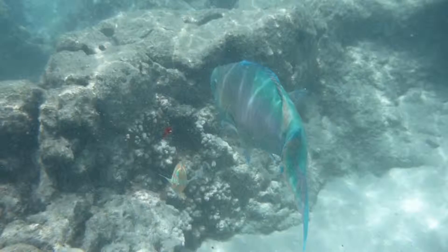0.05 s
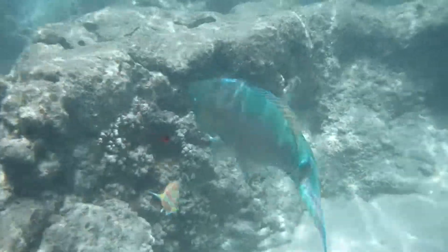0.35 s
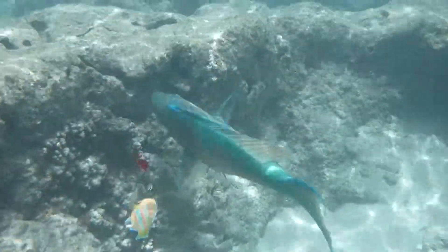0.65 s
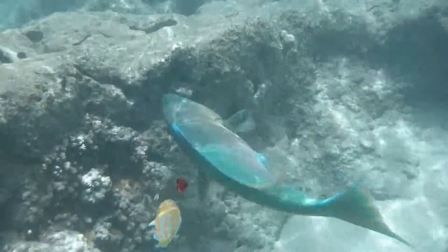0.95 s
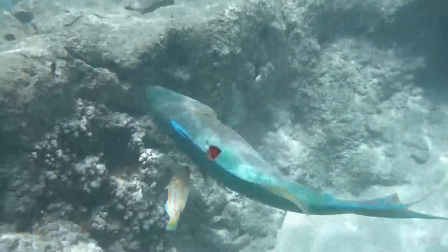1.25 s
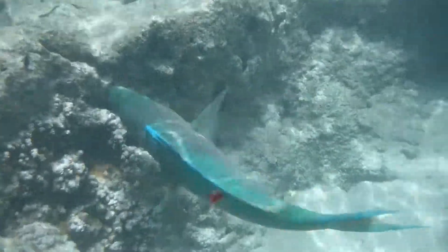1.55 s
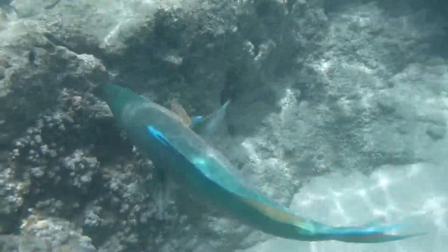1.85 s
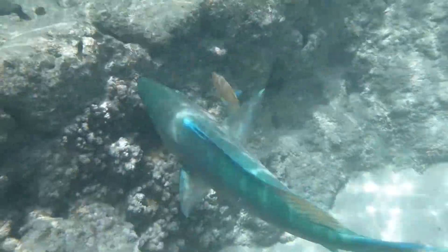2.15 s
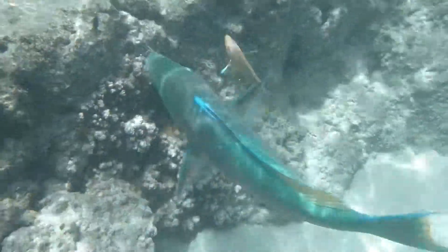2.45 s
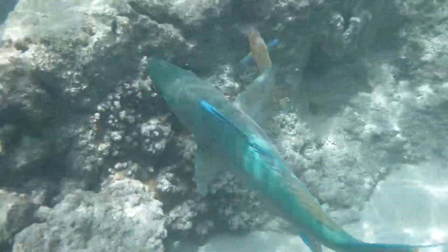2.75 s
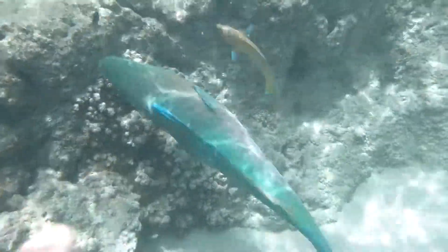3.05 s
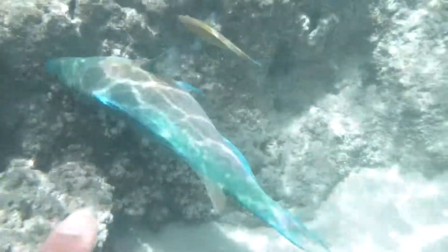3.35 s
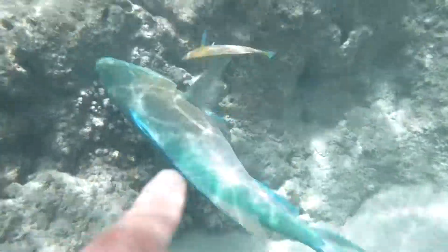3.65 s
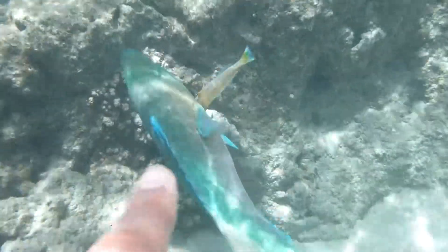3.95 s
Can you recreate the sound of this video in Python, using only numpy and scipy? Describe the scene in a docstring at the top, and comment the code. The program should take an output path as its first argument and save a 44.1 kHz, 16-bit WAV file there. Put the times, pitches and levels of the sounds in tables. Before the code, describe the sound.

Snapping shrimp crackle near and far on a reef over a low water rumble. A parrotfish rasps the coral twice. Between the bites, something rubs the underwater camera housing and thumps, while a small motor chirrs faintly.

```python
"""Shrimp and parrotfish on a reef

Under water, from a camera in its housing: snapping shrimp crackle near and far, and a parrotfish
rasps the coral twice with its beak. Water rumbles round the housing, which dulls the treble.
Something rubs along the housing and ends in a thump, and a small motor chirrs faintly inside.
There are sharp bright ticks, a faint wavering hum and a few soft low bumps."""
import sys
import numpy as np
from scipy.fft import rfft, irfft, next_fast_len
from scipy.io import wavfile
from scipy.ndimage import map_coordinates

SR = 44100
rng = np.random.default_rng(int(sys.argv[2]) if len(sys.argv) > 2 else 0)


def master_out(mix):
    """Clip the mix to full scale and print it as 16-bit PCM to the path in sys.argv[1]."""
    frames = np.transpose(np.atleast_2d(mix))
    ceiling = np.clip(frames, -1, 1)
    pcm = np.round(ceiling * 32767).astype(np.int16)
    wavfile.write(sys.argv[1], SR, pcm)


N = 176400
BURST_SIZE = 2048  # samples in one short sound; its time and frequency axes follow
BURST_T, BURST_HZ = np.arange(BURST_SIZE) / SR, np.fft.rfftfreq(BURST_SIZE, 1 / SR)


def amp(db):
    """Decibels to linear gain."""
    return 10 ** (np.asarray(db) / 20)


def unit(x):
    """Scale to rms 1."""
    return x / np.sqrt(np.mean(x ** 2) + 1e-20)


def colour_gain(colour, hz):
    """Gain at hz, from (Hz, dB) points joined on a log axis."""
    point_hz, point_db = np.transpose(colour)
    return amp(np.interp(np.log(hz + 1), np.log(point_hz + 1), point_db))


def curves(rows):
    """One value per sample for each column after the time."""
    times, *columns = np.transpose(rows)
    return [np.interp(np.arange(N) / SR, times, column) for column in columns]


def wobble(rate):
    """A smooth random curve, rate knots a second."""
    return map_coordinates(rng.standard_normal(N // 8), [np.arange(N) * rate / SR + 2])


def filtered(x, response):
    """Pass x through a complex frequency response."""
    size = next_fast_len(N + SR // 2)
    return irfft(rfft(x, size) * response(np.fft.rfftfreq(size, 1 / SR)), size)[:N]


def noise(colour):
    """Coloured noise of rms 1."""
    return unit(filtered(rng.standard_normal(N), lambda hz: colour_gain(colour, hz)))


def resonance(f, hz, width):
    """Causal response of one resonance."""
    return 1j * f * width / (hz * hz - f * f + 1j * f * width)


def burst(envelope, gain, length_s, crack=1.57):
    """A crack and a short spray of pulses, coloured by gain, with the energy of rms 1 over length_s."""
    cepstrum = irfft(np.log(np.maximum(gain, 1e-6)))
    cepstrum[1:BURST_SIZE // 2] *= 2  # minimum phase: nothing rings ahead of the crack
    cepstrum[BURST_SIZE // 2 + 1:] = 0
    spray = rfft(envelope * rng.standard_normal(BURST_SIZE))
    sound = irfft((crack + spray) * np.exp(rfft(cepstrum)))
    return unit(sound) * np.sqrt(length_s / BURST_T[-1])


def add(out, start, x):
    """Mix x into out from start, in seconds."""
    part = out[max(round(start * SR), 0):][:len(x)]
    part += x[:len(part)]


def snap(hz, width_hz=900, click_db=-22, decay_s=0.00086, echo_s=0.0055, echo_db=-8):
    """One collapsing claw bubble, a band of noise over a broad click, and its scatter off the reef."""
    # Each row: frequency in Hz, gain in dB.
    colour = [(600, -7), (1500, 7), (6300, 2), (7500, -9), (15000, -18)]
    band = np.exp(-.5 * ((BURST_HZ - hz) / width_hz) ** 2)
    gain = (band + amp(click_db)) * colour_gain(colour, BURST_HZ)
    envelope = np.exp(-BURST_T / decay_s) + amp(echo_db) * np.exp(-BURST_T / echo_s)
    return burst(envelope, gain, length_s=0.002)


def near_shrimp():
    """Shrimp close to the microphone, each snap standing out."""
    # Each row: start in seconds, level in dB, band centre in Hz.
    snaps = [(.199, -23, 3240), (.238, -18.5, 3930), (0.367, -20.5, 2970), (0.513, -18.5, 4550),
             (.796, -20.5, 2280), (0.8592, -19, 2820), (1.133, -21, 4050), (1.197, -24.5, 4470),
             (1.3054, -11.5, 2840), (1.347, -23, 3330), (1.611, -24.5, 3300), (1.827, -21.5, 3220),
             (1.978, -29, 3600), (2.056, -22.5, 4120), (2.332, -21, 3070), (2.409, -20, 1940),
             (2.506, -18, 2380), (2.651, -23.5, 4170), (2.668, -23.5, 3720), (2.753, -13, 4400),
             (2.872, -20.5, 3430), (2.928, -28.5, 3250), (2.947, -23.5, 3100), (2.985, -27, 3900),
             (3.009, -31, 1800), (3.039, -16, 4320), (3.075, -27, 2660), (3.164, -25.5, 3430),
             (3.231, -20.5, 3200), (3.327, -19.5, 3900), (3.380, -17.5, 4600), (3.507, -22.5, 4550),
             (3.606, -20.5, 3950), (3.908, -23.5, 1780), (3.941, -18, 2100)]
    out = np.zeros(N)
    for start, db, hz in snaps:
        add(out, start, amp(db) * snap(hz))
    return out


def parrotfish(release_s=0.0015, spread_octaves=.04):
    """Each bite is a run of slips over the coral: the beak catches, grinds briefly and lets go."""
    # Each row: start in seconds, level in dB, length in seconds, treble tilt in dB per octave.
    slips = [(0.867, -14, 0.0013, -1.5), (0.874, -21, 0.0062, 1), (0.884, -15, 0.0052, -8),
             (0.893, -14.5, 0.0012, -2.5), (0.9, -9, 0.004, 0.5), (0.906, -16, 0.0056, -1.5),
             (3.391, -8, 0.00084, -8), (3.403, -13, 0.0045, -6), (3.4123, -7.5, 0.0014, 0),
             (3.415, -17.5, 0.0096, 3), (3.4239, -10, 0.0024, -10), (3.432, -14.5, 0.0074, -0.5),
             (3.443, -17.5, 0.0099, -6)]
    # Each row: frequency in Hz, relative level of the beak's scrape in dB.
    beak_colour = [(40, -26), (130, -1), (740, -20), (1150, 1), (1700, -2.5), (2100, 2), (2700, -5),
                   (3300, 3), (3950, -5), (5700, -6), (7500, -23.5), (15000, -34.5)]
    treble_octaves = np.log2(np.clip(BURST_HZ, 2000, 6000) / 2000)
    out = np.zeros(N)
    for start, db, length, tilt_db in slips:
        envelope = np.exp(-np.maximum(BURST_T - length, 0) / release_s)
        shift = 2 ** (spread_octaves * rng.standard_normal())  # each spot of coral rings differently
        gain = colour_gain(beak_colour, BURST_HZ * shift) * amp(tilt_db * treble_octaves)
        add(out, start, amp(db) * burst(envelope, gain, length + release_s / 2))
    return out


def housing_rub():
    """Something drags along the housing, tightening until it lets go; its rasp rings three resonances."""
    # Each row: time in seconds, level of the low drag in dB, level of the rasp in dB.
    rub_levels = [(2.495, -61, -54), (2.508, -27.5, -31), (2.56, -32.5, -44), (2.58, -25, -33),
                  (2.599, -25, -23), (2.6075, -18, -11), (2.612, -55, -50)]
    # Each row of both colours: frequency in Hz, relative level in dB.
    drag_colour = [(40, -12), (130, 0.5), (350, 1.5), (800, -4), (4000, -37.5)]
    rasp_colour = [(1900, -12), (2550, -3), (3000, -10), (4400, 3), (5100, -7), (5800, -5), (7800, -25),
                   (15800, -50)]
    drag_db, rasp_db = curves(rub_levels)
    drag = noise(drag_colour)
    rasp = unit(noise(rasp_colour) * amp(2 * wobble(700)))
    return amp(drag_db) * drag + amp(rasp_db) * rasp


def housing_thumps(first_hz=233, halving_s=0.01, decay_s=0.0028, rise_s=.0014):
    """The rub lets go with a thump that sags in pitch; two faint ones follow."""
    # Each row: start in seconds, gain in dB.
    thumps = [(2.6088, 4.5), (2.658, -15), (2.669, -15)]
    cycles = first_hz * halving_s * np.log1p(BURST_T / halving_s)
    envelope = np.exp(-BURST_T / decay_s) * (1 - np.exp(-BURST_T / rise_s))
    out = np.zeros(N)
    for start, db in thumps:
        add(out, start, amp(db) * envelope * np.cos(2 * np.pi * cycles))
    return out


def bright_ticks(decay_s=.0011):
    """Sharp bright ticks, some of them the crisp top of a near shrimp snap."""
    # Each row: start in seconds, level in dB.
    ticks = [(1.769, -36.5), (1.889, -26), (2.500, -28), (2.7539, -36), (3.04, -33), (3.607, -31)]
    # Each row: frequency in Hz, relative level in dB.
    tick_colour = [(200, -29), (2500, -7), (5500, 6), (7500, -1), (10000, -3), (12500, -14)]
    gain = colour_gain(tick_colour, BURST_HZ)
    out = np.zeros(N)
    for start, db in ticks:
        add(out, start, amp(db) * burst(np.exp(-BURST_T / decay_s), gain, length_s=0.0055))
    return out


def far_shrimp(snaps_per_s=65, centre_hz=4000, spread_octaves=.45, spread_db=3.5):
    """Weaker snaps farther off, over the flickering haze of the farthest shrimp and a smooth hiss."""
    # Each row of both colours: frequency in Hz, relative level in dB.
    haze_colour = [(300, -15), (1000, 3.5), (2000, 3.5), (3400, 11), (5600, 6.5), (7300, -7.5),
                   (15000, -29)]
    hiss_colour = [(4000, -4), (10000, -0.5), (13000, -7)]
    haze = unit(noise(haze_colour) * amp(4.04 * wobble(120)))
    crackle = np.zeros(N)
    for _ in range(int(snaps_per_s * N / SR)):
        start = rng.uniform(0, N / SR)
        size, pitch = np.clip(rng.standard_normal(2), -2, 2)
        hz = centre_hz * 2 ** (spread_octaves * pitch)
        add(crackle, start, amp(spread_db * min(size, 1.4)) * snap(hz))
    return amp(-42.5) * unit(crackle) + amp(-41.5) * haze + amp(-60.5) * noise(hiss_colour)


def water(surge_db=2.5):
    """Uneven low rumble of water moving round the housing."""
    # Each row: time in seconds, level of the rumble in dB.
    rumble_levels = [(0, -42), (.55, -38), (1.5, -41.5), (2.5, -41.5), (2.8, -43.5), (3.34, -40.5),
                     (3.55, -49), (4, -43.5)]
    # Each row: frequency in Hz, relative level in dB.
    rumble_colour = [(20, -12), (85, 1.5), (190, 4.5), (300, -1), (460, -0.5), (620, -6), (800, -1.5),
                     (1000, -14), (2000, -10), (5000, -63)]
    rumble = unit(noise(rumble_colour) * amp(surge_db * wobble(34.85)))
    return amp(curves(rumble_levels)[0]) * rumble


def hum_and_bumps():
    """A faint wavering hum from the camera near 790 Hz, and a few soft low bumps."""
    # Each row: middle in seconds, level in dB, pitch in Hz, half length in seconds.
    tones = [(0.787, -46.5, 785, 0.42), (1.71, -34, 88, 0.034), (2.357, -40.5, 793, 0.12),
             (2.453, -37, 90.2, 0.024), (3.306, -37, 102.8, 0.032)]
    t, out = np.arange(N) / SR, np.zeros(N)
    for middle, db, hz, half_length in tones:
        swell = amp(db) * np.exp(-((t - middle) / half_length) ** 2)
        flutter = 1 + .5 * wobble(39.86)
        out += swell * flutter * np.sin(2 * np.pi * hz * t + wobble(60))
    return out


def motor(pulses_per_s=15, pulse_s=0.04):
    """A small motor, probably the lens drive, chirrs in short even pulses and rings the housing."""
    # Each row is one spell: first pulse in seconds, end in seconds, level in dB.
    spells = [(0.013, .87, -34.5), (0.946, 1.155, -40), (1.411, 2.32, -38.5), (2.703, 3.85, -49)]
    # Each row is one resonance: centre in Hz, width in Hz, gain in dB.
    modes = [(1900, 190, -7), (2850, 60, -1), (2980, 260, -2)]

    def ring(f):
        return sum(amp(db) * abs(resonance(f, hz, width)) ** 2 for hz, width, db in modes)

    t, pulses = np.arange(N) / SR, np.zeros(N)
    for first, end, db in spells:
        for middle in np.arange(first, end, 1 / pulses_per_s):
            pulses += amp(db) * np.exp(-(2 * (t - middle) / pulse_s) ** 4)
    return pulses * unit(filtered(rng.standard_normal(N), ring))


def scene():
    """All sources at the one microphone."""
    close = water() + hum_and_bumps() + housing_rub() + bright_ticks() + housing_thumps() + motor()
    return (close + parrotfish() + near_shrimp() + far_shrimp())[None]


def record(dry, low_cut_hz=52, top_hz=16000):
    """The housing swallows two narrow bands; the recorder cuts deep bass, clips and limits the band."""
    # Each row is one swallowed band: centre in Hz, width in Hz.
    notches = [(2890, 48), (11700, 1170)]

    def response(f):
        cut_width = low_cut_hz * np.sqrt(2)
        low_cut = resonance(f, low_cut_hz, cut_width) * 1j * f / cut_width
        return low_cut * np.prod([1 - resonance(f, hz, width) for hz, width in notches], axis=0)

    clipped = np.clip(filtered(dry[0], response), -1, 1)
    return filtered(clipped, lambda hz: hz < top_hz)[None]


dry = scene()
out = record(dry)
master_out(out)
```